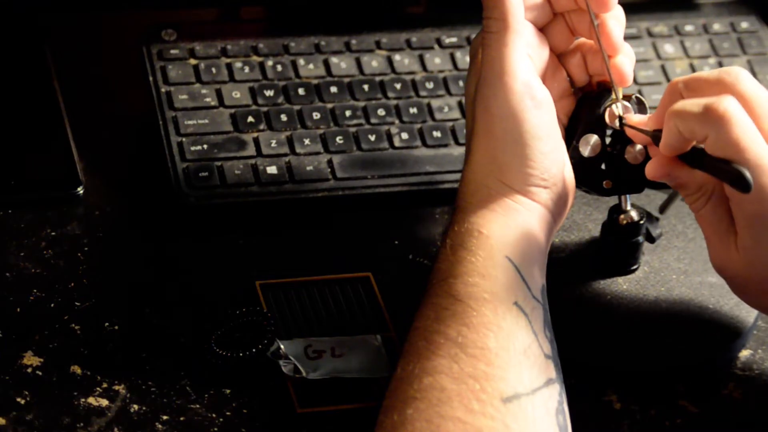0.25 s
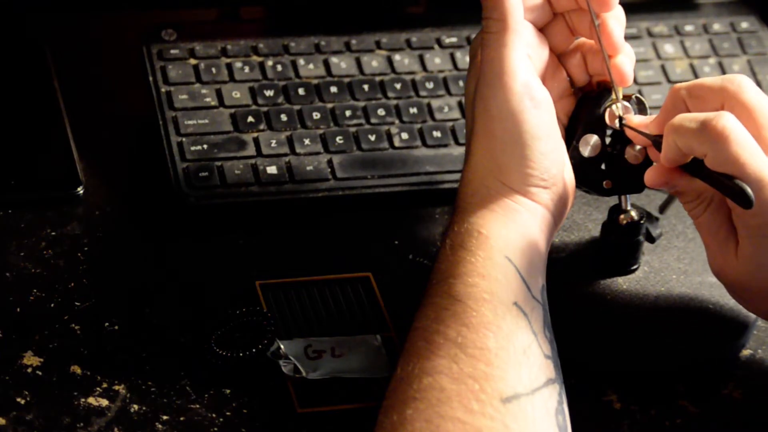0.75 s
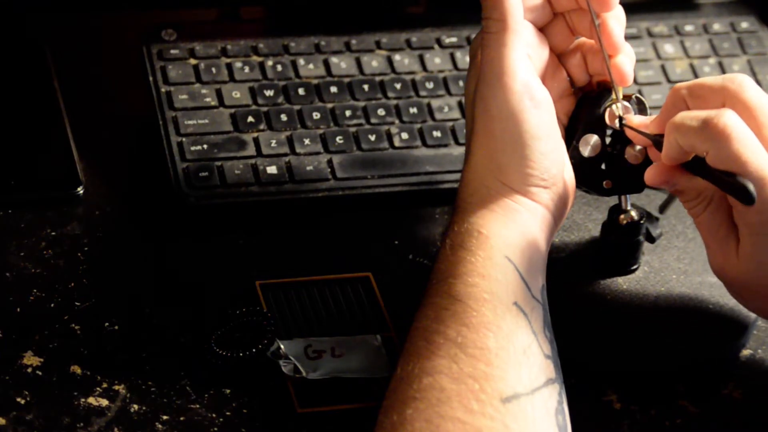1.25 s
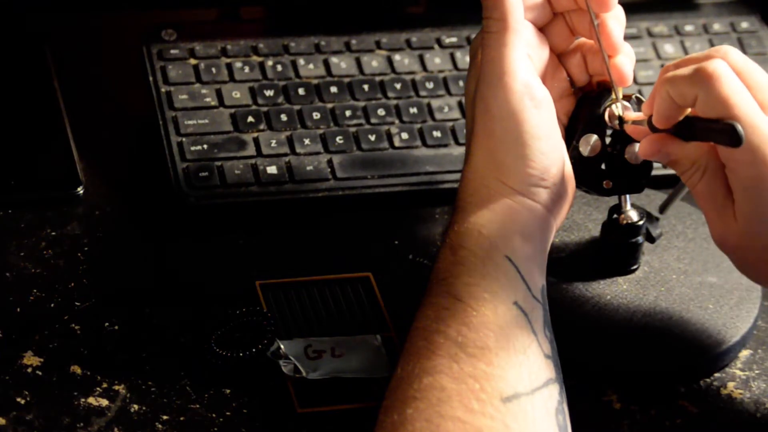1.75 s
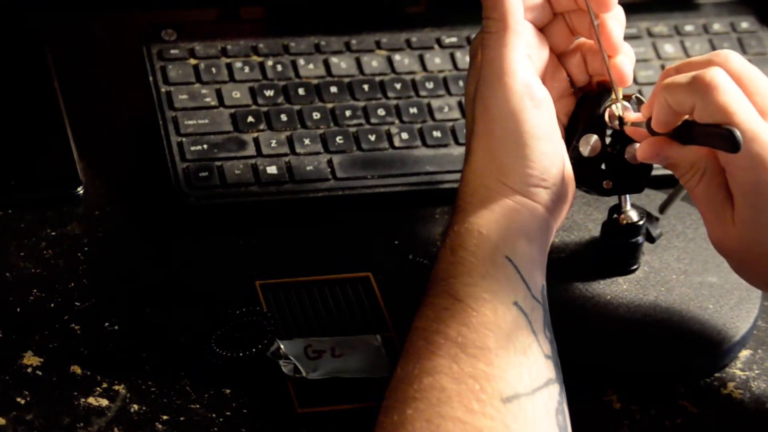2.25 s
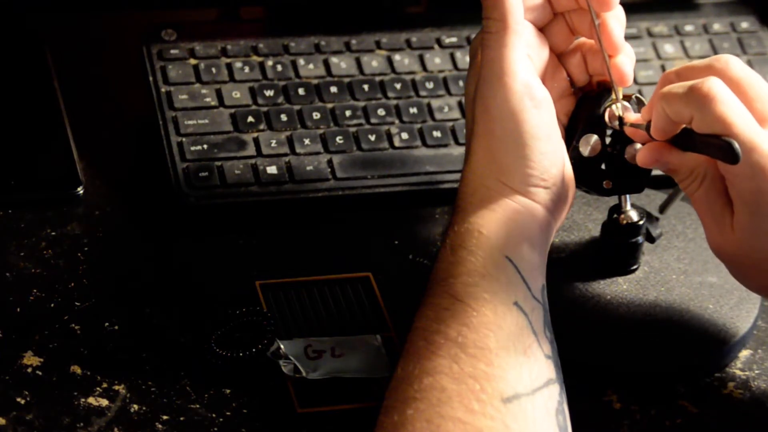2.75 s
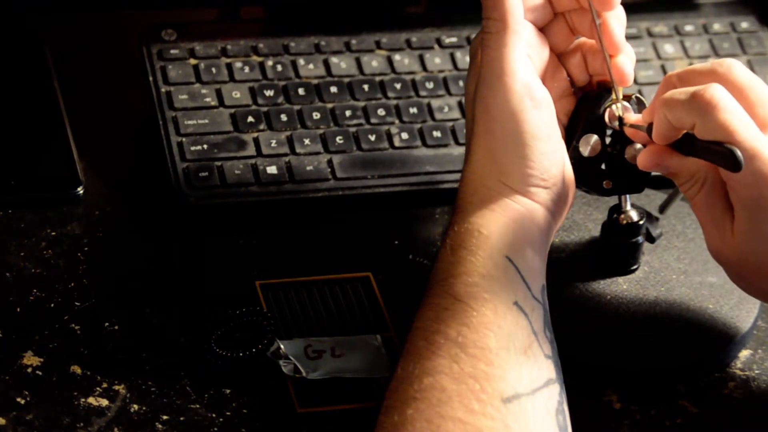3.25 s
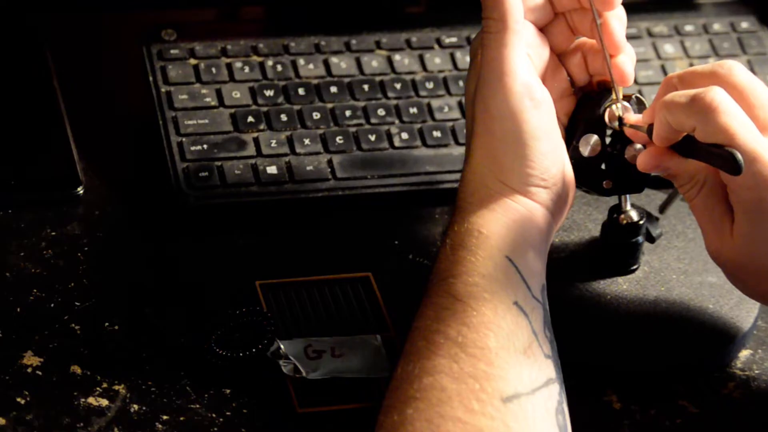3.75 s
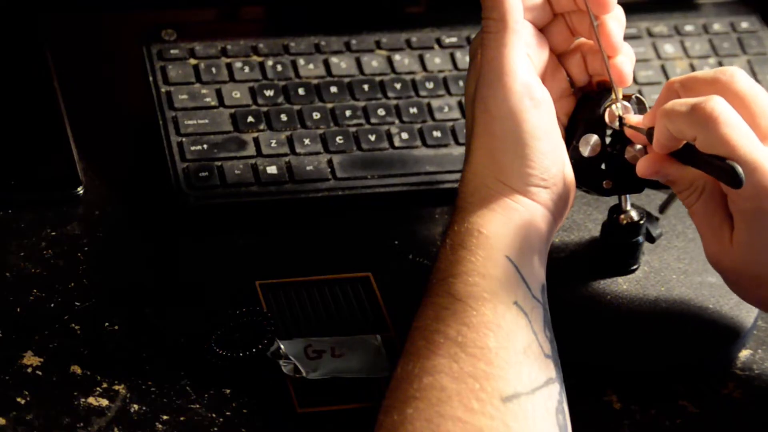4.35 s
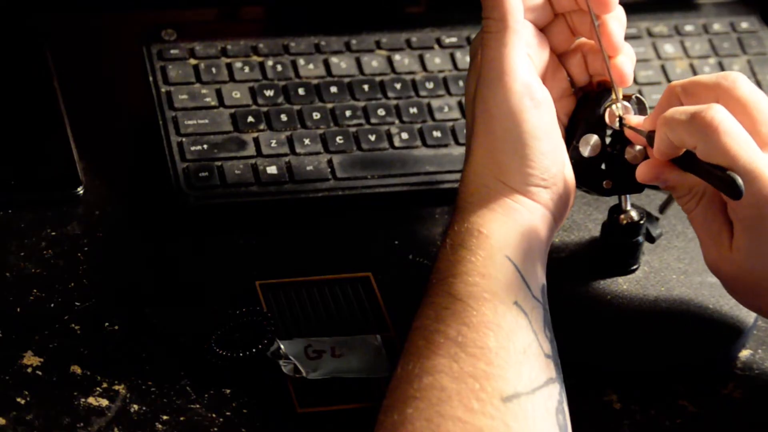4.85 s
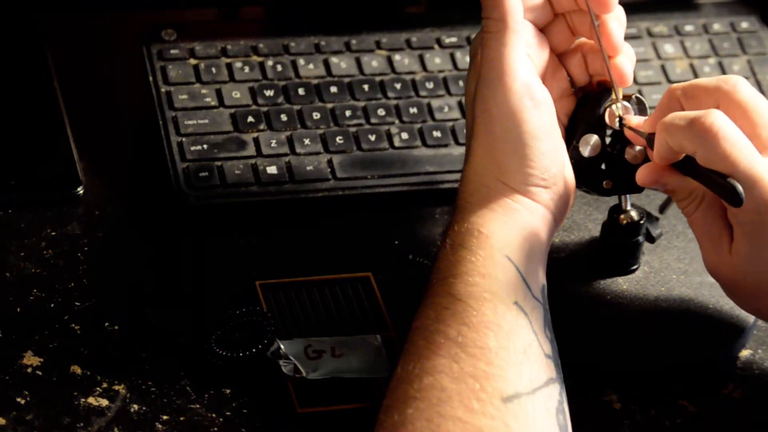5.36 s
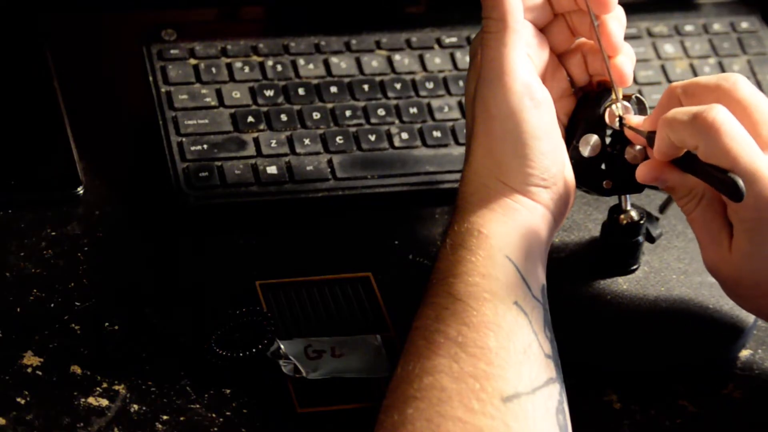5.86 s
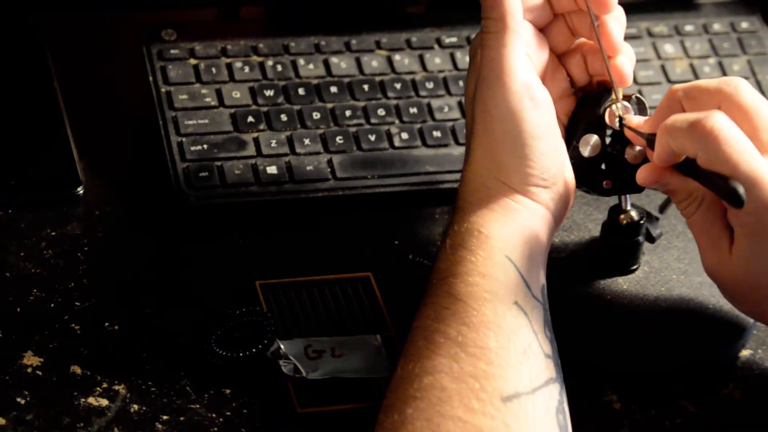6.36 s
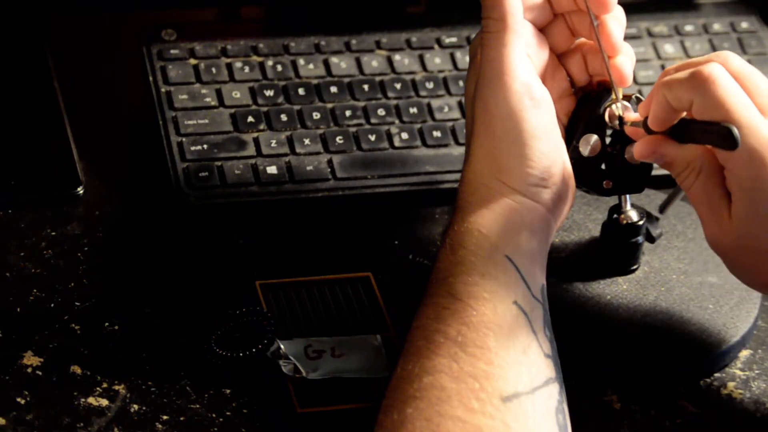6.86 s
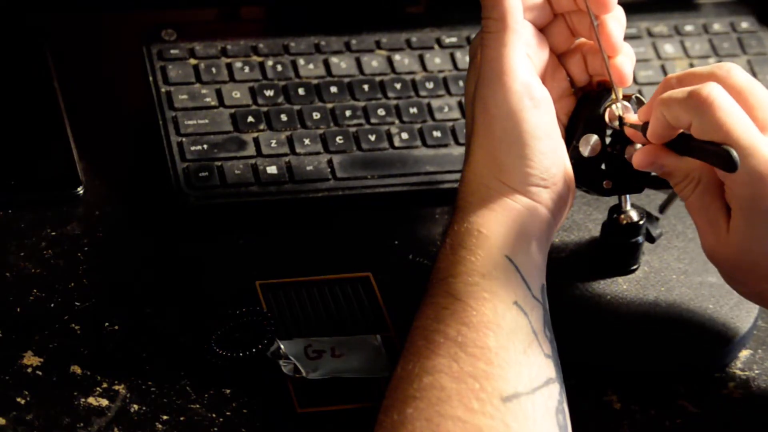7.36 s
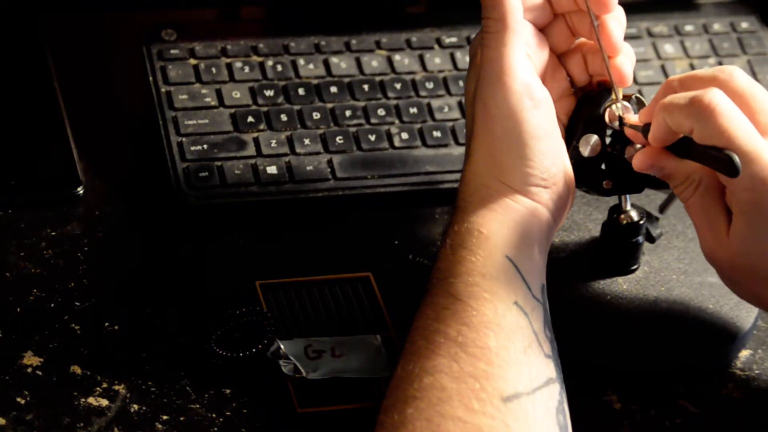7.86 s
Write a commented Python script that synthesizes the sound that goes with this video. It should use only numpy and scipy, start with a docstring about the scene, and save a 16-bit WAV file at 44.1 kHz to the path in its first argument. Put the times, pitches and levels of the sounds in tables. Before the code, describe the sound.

A pick snaps lock pins one by one, bright short clicks with small thuds beneath, while mains hum, motor and soft hiss continue.

```python
"""Mains hum, a motor, faint rubbing and hiss run all through a quiet room; motor and hum beat slowly together.
A pick touches a padlock in a small desk vise, and its pins begin to snap: each click rings the lock,
then jolts the vise. The hand shifts its grip; later the hardest snap comes as a quick cluster with its rebound.
One more snap and some light touches follow, and the grip shifts again near the end.
Clicks are filtered noise bursts plus fading sines; the background is steady sines and shaped noise."""
import sys
import numpy as np
from scipy import signal
from scipy.fft import rfft, irfft
from scipy.io import wavfile

SR = 44100
rng = np.random.default_rng(int(sys.argv[2]) if len(sys.argv) > 2 else 0)


def master_out(mix):
    """Clip the mix to full scale and print it as 16-bit PCM to the path in sys.argv[1]."""
    frames = np.transpose(np.atleast_2d(mix))
    ceiling = np.clip(frames, -1, 1)
    pcm = np.round(ceiling * 32767).astype(np.int16)
    wavfile.write(sys.argv[1], SR, pcm)


N = 356857  # length in samples

# Ringing tones (modes) of the lock with the tools in it.
# Each row: frequency in Hz, relative level in dB, time to fade by 60 dB in seconds.
LOCK_MODES = [(738, -18, 0.084), (822, -10.5, 0.069), (958, -10.5, 0.066), (1011, -8, 0.074),
              (1097, -13.5, 0.086), (1150, -21, 0.071), (1580, -16, 0.064), (1678, -7, 0.061),
              (1910, -6.5, 0.056), (2350, -9, 0.099), (2550, -8.5, 0.049), (2556, -15, 0.053),
              (2745, -24, 0.13), (3196, 6, 0.044), (3235, 0, 0.065), (3282, -5, 0.13), (3600, -18, 0.075),
              (3550, -10, 0.069), (3780, -29, .13), (4250, -29, .14), (4740, -16, 0.18), (5020, -2, 0.052),
              (5230, -10, 0.06), (6380, -17, 0.066), (6700, -16, .09), (7000, -16, 0.058),
              (7900, -11, 0.045), (10300, -10, .04)]
# Colour of the dense clatter of pins and springs. Each row: frequency in Hz, relative level in dB per Hz.
CLATTER_COLOUR = [(100, -29), (600, -16), (850, -4.5), (1150, 5), (1300, -14), (1550, 6.5), (1900, -20),
                  (2100, 0.5), (2400, -8.5), (3900, 6), (5500, 2), (7500, -4.5), (8600, -12), (12000, -28)]
# Colour of the first metal contact. Each row: frequency in Hz, relative level in dB per Hz.
CRACK_COLOUR = [(500, -20), (2100, -1.5), (2700, -8), (4200, -5.5), (7400, 1.5), (8800, -8.5), (11000, -8),
                (12200, -26), (14500, -16), (16000, -39)]
# How the lock radiates every click. Each row: frequency in Hz, level change in dB.
LOCK_RADIATION = [(780, -5.5), (1070, 2.5), (1550, -3), (2050, -6), (2550, 0), (3250, 0.5), (4000, 2),
                  (5200, 4), (6500, 4), (8000, -1), (11000, 0), (14000, 3)]
# How long the room echoes. Each row: frequency in Hz, time to fade by 60 dB in seconds.
ROOM_DECAY = [(150, 0.73), (1000, 0.16), (4000, 0.23), (7000, 0.19), (14000, 0.22)]
# Pins that snap under tension; the hard one slips first and rebounds after.
# Each row: start in seconds, strength in dB, brightness in dB per octave, blow into the case in dB,
# clatter against the ringing in dB, desk thud in dB, note of the pin in Hz.
PIN_SNAPS = [(2.0422, -6.5, -7.5, 3, -9, -17, 5540), (3.3457, -2, -1.8, -6, -7, -37, 5480),
             (3.8377, -14, -3.5, -4, 2, -20, 6460), (3.8491, 0, -0.9, 7.5, -2, 2, 6430),
             (3.867, -16, -2.5, 10, 0, -13, 6450), (5.027, -3, -5, 0, -12, -25, 4980)]
# Light touches of the pick on a pin.
# Each row: start in seconds, strength in dB, brightness in dB per octave, desk thud in dB.
PICK_TOUCHES = [(1.7998, -19, -4.5, -15.5), (2.535, -21.5, -9.5, -29), (3.253, -21.5, -3.5, -31),
                (4.663, -26, -3, -35.5), (6.592, -24, -3, -31), (6.73, -27, -9, -30), (7.681, -28, -3, -37)]
# Ringing tones of the vise on the desk.
# Each row: frequency in Hz, relative level in dB, time to fade by 60 dB in seconds.
DESK_MODES = [(179.6, -2, 0.19), (204, -5, 0.17), (252, -9.5, 0.24), (329, -10, 0.24), (391, -6.5, 0.13),
              (450, -1, .07), (494, -9, 0.066)]
# Colour of the short push on the desk. Each row: frequency in Hz, relative level in dB.
PUSH_COLOUR = [(80, 1), (125, -10), (180, -3), (440, 3), (600, -15), (2000, -7), (8000, -50)]
# So small a body radiates no deep bass. Each row: frequency in Hz, relative level in dB.
THUD_RADIATION = [(30, -17), (90, -3), (150, -4)]
# The hand shifts its grip. Each row: start in seconds, length in seconds, full level in dB rms.
GRIP_SHIFTS = [(2.65, 1.14, -53.5), (7.45, 1.2, -56.5)]
# Colour of the rubbing grip. Each row: frequency in Hz, relative level in dB per Hz.
GRIP_COLOUR = [(30, -21), (75, -18), (150, -1), (230, -3), (350, 0.5), (440, -6.5), (600, -14), (2000, -49)]
# Motor tones, from shaft to whine. Each row: frequency in Hz, level in dB rms.
MOTOR_TONES = [(30, -77), (97.8, -75), (156.5, -76), (177, -69), (340.8, -77), (2506, -74), (4104, -75),
               (4134, -76), (4164, -74), (4194, -72), (4224, -75), (4254, -72), (4310, -75)]
# Strongest partials of the hum. Each row: multiple of the mains frequency, level in dB rms.
STRONG_HUM = [(1, -64.5), (2, -73), (3, -60), (4, -60), (6, -70.5), (7, -70.5), (9, -68), (10, -71.5),
              (12, -64), (14, -67), (15, -68.5), (16, -69), (17, -60), (18, -75), (21, -68.5), (22, -70),
              (23, -68), (24, -68), (27, -69), (29, -71), (30, -64), (31, -70), (37, -65.5), (39, -72),
              (45, -71), (65, -67)]
# Outline of the weaker hum partials. Each row: frequency in Hz, typical level of one partial in dB rms.
BUZZ_OUTLINE = [(400, -76), (1200, -74), (2000, -81), (2600, -76.5), (3500, -82.5), (3900, -79),
                (4600, -75), (5100, -76), (5700, -88.5), (6600, -86)]
# Moving air and microphone hiss. Each row: frequency in Hz, level in dB per Hz.
AIR_COLOUR = [(15, -101), (45, -91), (75, -86), (150, -76.5), (200, -79.5), (260, -81), (340, -85),
              (480, -87), (800, -86), (1200, -90.5), (2400, -94.5), (3600, -95), (7500, -102),
              (15000, -105)]
# Resonances of the motor housing in that noise. Each row: frequency in Hz, width in Hz, lift in dB.
HOUSING_RESONANCES = [(94.6, 17, 6), (558.4, 13, 10), (612, 16, 3), (4110, 630, 5.5), (5050, 2000, 6)]

CASE_HZ, CASE_T60, PIN_T60 = 1442, 0.065, 0.052  # lock case note (Hz); 60 dB fades of case and pin (s)
# A harder blow into the case makes the case note louder and the pin's own note weaker.
CASE_DB, CASE_GAIN = -7, 1.4  # relative level (dB), dB gained per dB of blow
PIN_DB, PIN_LOSS = -2, 0.4  # relative level (dB), dB lost per dB of blow
# A touch hardly reaches the case: blow (dB), clatter (dB), note of the pin (Hz).
TOUCH_CASE_DB, TOUCH_CLATTER_DB, TOUCH_PIN_HZ = -14, -8, 5560
PIVOT_HZ = 3170  # brightness tilts a click around this frequency
SHELL_HZ, SHELL_OCTAVES = 2760, 0.93  # broad hump changed by a case blow: centre, width
GRIP_RISE_S, GRIP_FALL_S = 0.19, 0.37
GRIP_REST_DB = -66.5  # the resting hand still rubs faintly (dB rms)
MAINS_HZ = 60.0055
# Fifth mains harmonic, the motor tone beside it (Hz), and a moment when they swell together (s).
THROB_HZ, THROB_S = (300.03, 298.22), 0.18
EDGE_HZ = 15850  # upper edge of the sound


def picking(jolt_delay_s=0.00697):
    """Every snap or touch rings the lock and is followed by a jolt of the vise."""
    t = np.arange(SR // 3) / SR
    out = np.zeros(N)
    touches = [(start, db, bright_db, TOUCH_CASE_DB, TOUCH_CLATTER_DB, thud_db, TOUCH_PIN_HZ)
               for start, db, bright_db, thud_db in PICK_TOUCHES]
    for start, db, bright_db, case_db, clatter_db, thud_db, pin_hz in PIN_SNAPS + touches:
        click = pin_snap(t, bright_db, case_db, clatter_db, pin_hz)
        add(out, start, gain_of(db) * click)
        add(out, start + jolt_delay_s, gain_of(thud_db) * desk_thud(t))
    return out


def pin_snap(t, bright_db, case_db, clatter_db, pin_hz,
             crack_db=-3, crack_s=0.0031, clatter_s=0.013, rise_s=0.0017, room_db=-9):
    """A pin chatters for some milliseconds, the lock rings up, and the room answers."""
    grit, rattle = rng.standard_normal((2, len(t)))
    crack = unit(colour(grit * np.exp(-(t / crack_s) ** 2), CRACK_COLOUR))
    clatter = unit(colour(rattle * np.exp(-t / clatter_s), CLATTER_COLOUR))
    # each pin adds its own note, and rocks the case more or less
    case_mode = (CASE_HZ, CASE_DB + CASE_GAIN * case_db, CASE_T60)
    pin_mode = (pin_hz, PIN_DB - PIN_LOSS * case_db, PIN_T60)
    ringing = ring(LOCK_MODES + [case_mode, pin_mode], t, spread_db=1.5)
    metal = unit(ringing * (1 - np.exp(-(t / rise_s) ** 2)))
    direct = metal + gain_of(crack_db) * crack + gain_of(clatter_db) * clatter
    echo = signal.fftconvolve(direct, room_tail(t, onset_s=0.0028))[:len(t)]
    sound = direct + gain_of(room_db) * echo
    # a sharp contact tilts the click up; a square blow into the case fills its middle
    hz, db = np.transpose(LOCK_RADIATION)
    tilt = bright_db * np.log2(hz / PIVOT_HZ)
    shell = np.exp(-(np.log2(hz / SHELL_HZ) / SHELL_OCTAVES) ** 2)
    return colour(sound, list(zip(hz, db + tilt + case_db * shell)))


def ring(modes, t, spread_db, slip=0.12):
    """Fading tones start nearly together; every blow excites them a little differently."""
    hz, db, t60 = np.transpose(modes)[:, :, None]
    phase, chance = rng.standard_normal((2, *hz.shape))
    fade = np.exp(-np.log(1000) * t / t60)
    wave = np.sin(2 * np.pi * (hz * t + slip * phase))  # slip is in cycles
    return unit((gain_of(db + spread_db * chance) * fade * wave).sum(0))


def room_tail(t, onset_s):
    """Diffuse reflections swell in, then fade at a rate that depends on frequency."""
    hz, at, z = signal.stft(rng.standard_normal(len(t)), SR, nperseg=256)
    z = z * np.exp(-np.log(1000) * at / read(ROOM_DECAY, hz)[:, None])
    tail = signal.istft(z, SR)[1][:len(t)]
    return unit(tail * (1 - np.exp(-(t / onset_s) ** 2)))


def desk_thud(t, push_s=0.0006):
    """One short low push sets the vise and desk booming."""
    u = t / push_s
    push = unit(colour((1 - u) * np.exp(-u), PUSH_COLOUR))
    boom = ring(DESK_MODES, t, spread_db=2.5, slip=0.29) * (1 - np.exp(-u))
    return unit(colour(boom + push, THUD_RADIATION))


def grip():
    """Skin rubbing on the vise comes through as a soft rumble that swells at each shift."""
    t = np.arange(N) / SR
    shape = gain_of(read(GRIP_COLOUR, np.fft.rfftfreq(N, 1 / SR)))
    rub = irfft(rfft(rng.standard_normal(N)) * shape, N)
    shifts = np.zeros(N)
    for start, length, db in GRIP_SHIFTS:
        rise = (t - start) / GRIP_RISE_S
        fall = (start + length - t) / GRIP_FALL_S
        shifts += gain_of(db) * np.clip(np.minimum(rise, fall), 0, 1)
    return rub / rub.std() * np.maximum(shifts, gain_of(GRIP_REST_DB))


def motor():
    """A running motor gives shaft tones, and a whine with sidebands one shaft turn apart."""
    return tones(MOTOR_TONES, waver=0.12)


def throb(mains_db=-56.5, motor_db=-62.5):
    """The motor slips a little behind the mains, so their tones near 300 Hz beat slowly."""
    t = np.arange(N) / SR - THROB_S
    start = rng.random()
    out = np.zeros(N)
    for hz, db in zip(THROB_HZ, (mains_db, motor_db)):
        out += np.sqrt(2) * gain_of(db) * np.sin(2 * np.pi * (hz * t + start))
    return out


def hum(scatter_db=4.0, count=104):
    """Mains harmonics: a few strong ones and a fine buzz of weaker ones."""
    strong = dict(STRONG_HUM)
    orders = np.arange(1, count)
    weak_db = read(BUZZ_OUTLINE, orders * MAINS_HZ) + scatter_db * rng.standard_normal(len(orders))
    return tones([(k * MAINS_HZ, strong.get(k, db)) for k, db in zip(orders, weak_db)], waver=0.028)


def tones(lines, waver):
    """Tones of steady level (Hz, dB rms) wander slightly in phase (waver in radians)."""
    t = np.arange(N) / SR
    out = np.zeros(N)
    knots = np.linspace(0, t[-1], num=24)
    for hz, db in lines:
        drift = np.interp(t, knots, waver * rng.standard_normal(len(knots)))
        out += np.sqrt(2) * gain_of(db) * np.sin(2 * np.pi * (hz * t + rng.random()) + drift)
    return out


def air():
    """Steady noise of moving air and microphone hiss, lifted at the housing resonances."""
    hz = np.fft.rfftfreq(N, 1 / SR)
    db = read(AIR_COLOUR, hz)
    for centre, width, lift in HOUSING_RESONANCES:
        db = db + lift * np.exp(-(2 * (hz - centre) / width) ** 2)
    # the last factor turns levels per Hz into sample values
    return irfft(rfft(rng.standard_normal(N)) * gain_of(db), N) * np.sqrt(SR / 2)


def gain_of(db):
    """Turns decibels into amplitude."""
    return 10 ** (np.asarray(db) / 20)


def read(points, hz):
    """Joins (Hz, value) points by lines on a log-frequency axis."""
    f, value = np.transpose(points)
    return np.interp(np.log(hz + 1), np.log(f + 1), value)


def unit(x):
    """Scales a sound to energy 1."""
    return x / np.sqrt(np.sum(x ** 2) + 1e-20)


def add(mix, start, sound):
    """Mixes a sound in at a start time in seconds."""
    part = mix[round(start * SR):][:len(sound)]
    part += sound[:len(part)]


def colour(x, points):
    """Filters to a (Hz, dB) outline without sounding ahead of time, so attacks stay sharp."""
    size = 2 * len(x)
    log_gain = np.log(gain_of(read(points, abs(np.fft.fftfreq(size, 1 / SR)))))
    response = np.exp(np.conj(signal.hilbert(log_gain)))  # minimum phase
    return irfft(rfft(x, size) * response[:len(x) + 1])[:len(x)]


def scene():
    """All sources add up at one microphone, which feeds both channels."""
    mix = picking() + grip() + hum() + throb() + motor() + air()
    return np.tile(mix, (2, 1))


def record(dry):
    """A low-pass filter takes away the treble above the upper edge."""
    lowpass = signal.firwin(511, EDGE_HZ, window=("kaiser", 9), fs=SR)
    return signal.oaconvolve(dry, lowpass[None], "same")


dry = scene()
out = record(dry)
master_out(out)
```